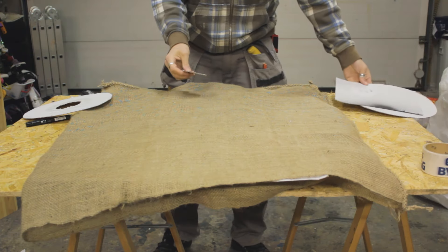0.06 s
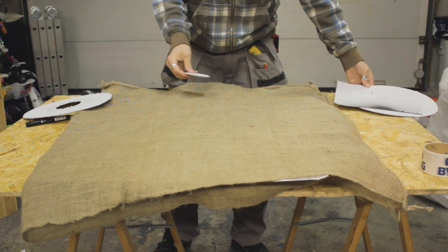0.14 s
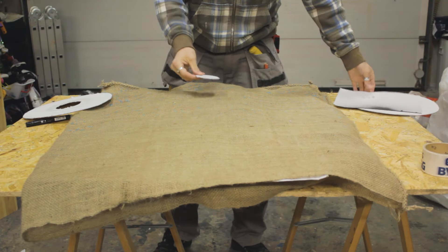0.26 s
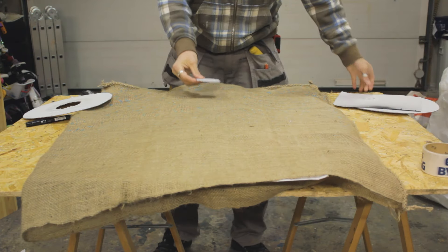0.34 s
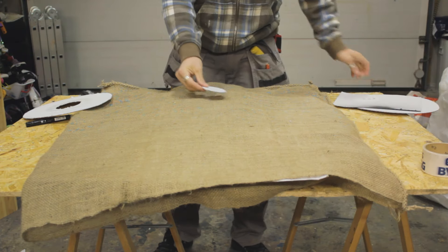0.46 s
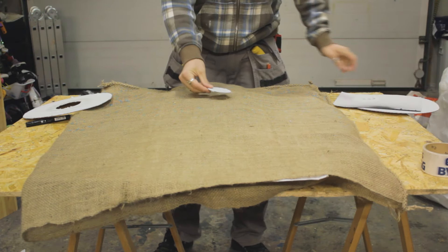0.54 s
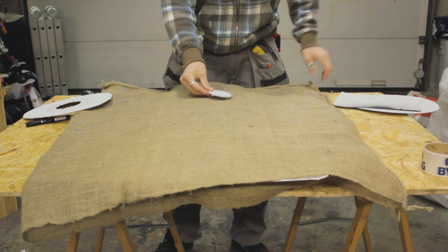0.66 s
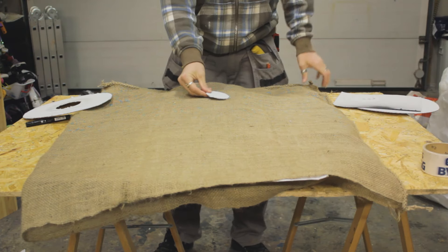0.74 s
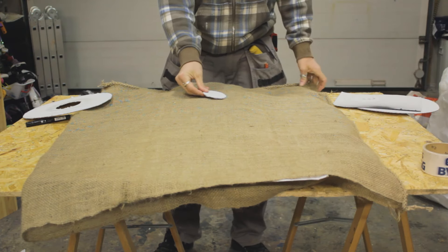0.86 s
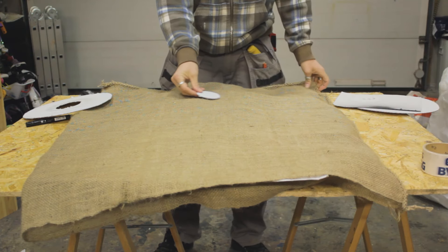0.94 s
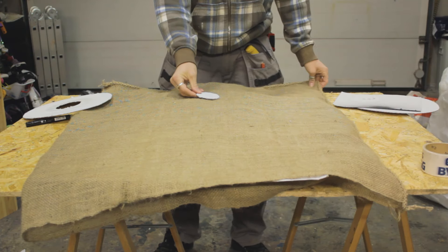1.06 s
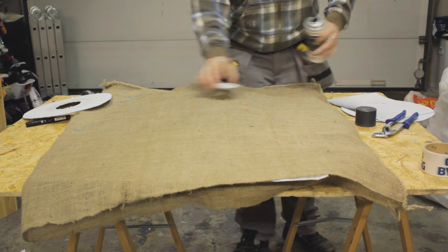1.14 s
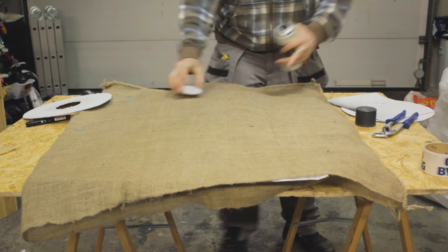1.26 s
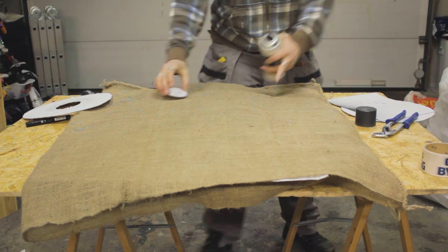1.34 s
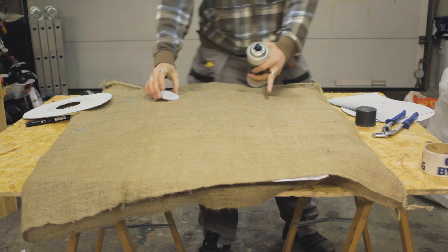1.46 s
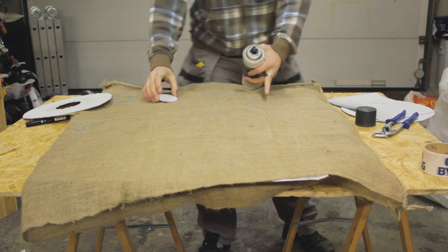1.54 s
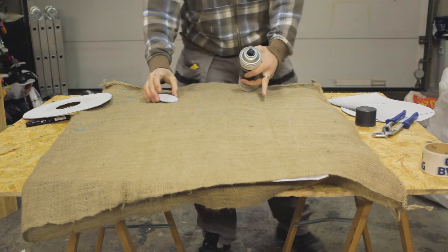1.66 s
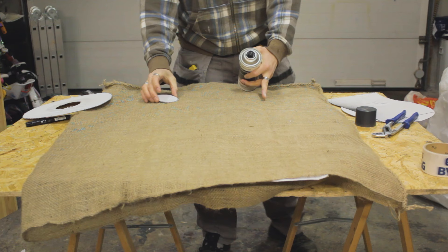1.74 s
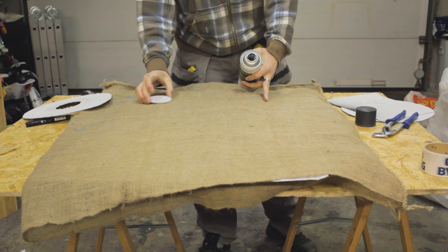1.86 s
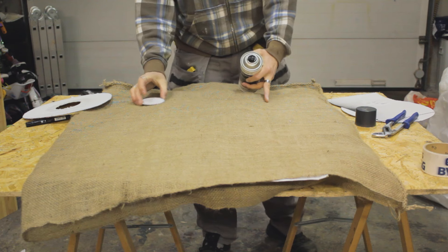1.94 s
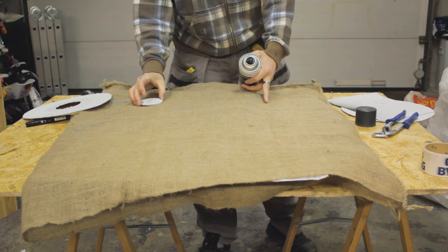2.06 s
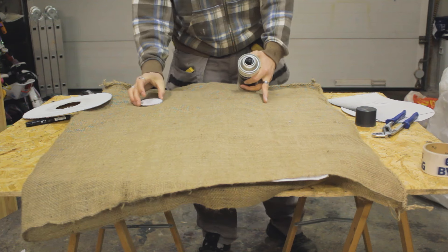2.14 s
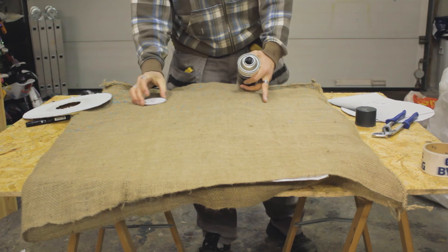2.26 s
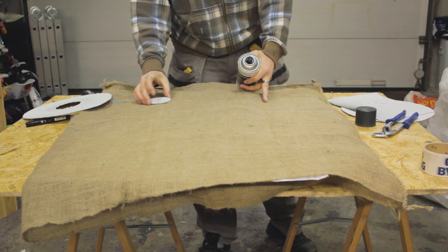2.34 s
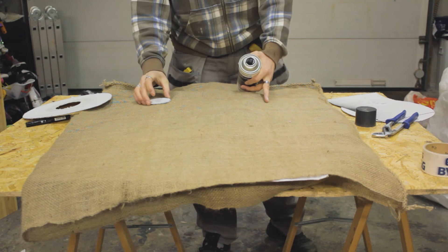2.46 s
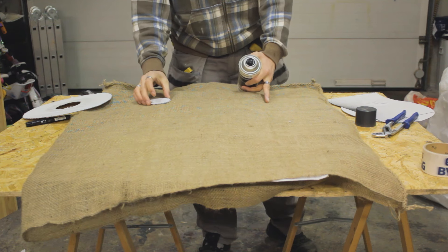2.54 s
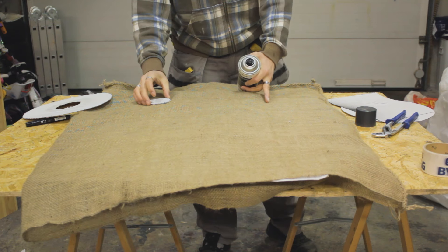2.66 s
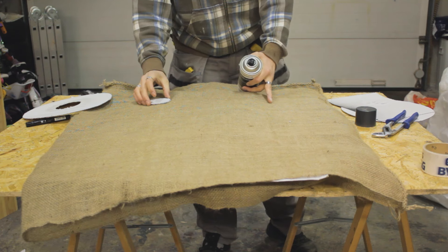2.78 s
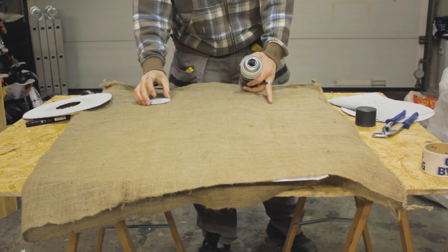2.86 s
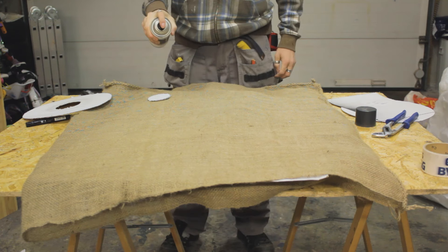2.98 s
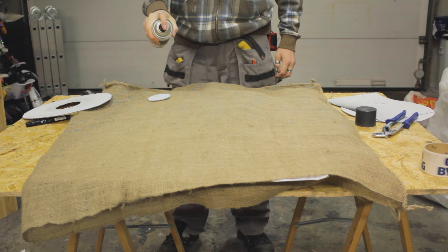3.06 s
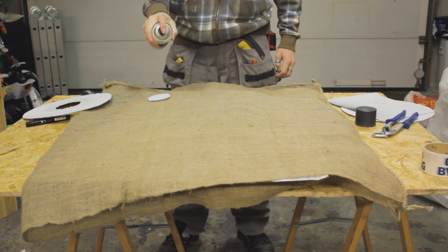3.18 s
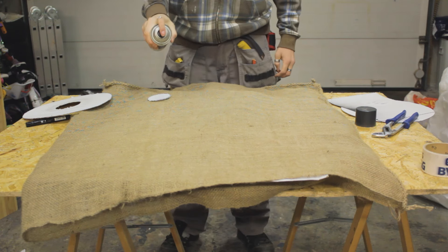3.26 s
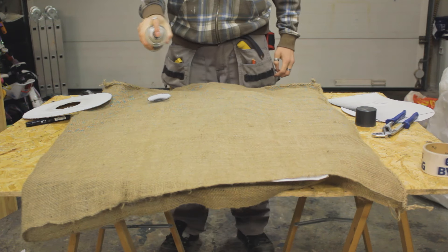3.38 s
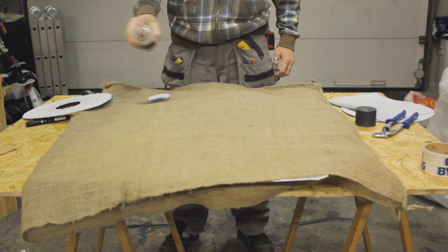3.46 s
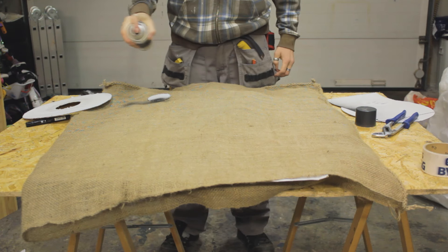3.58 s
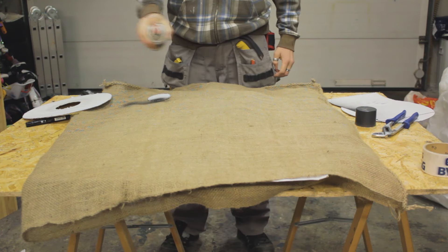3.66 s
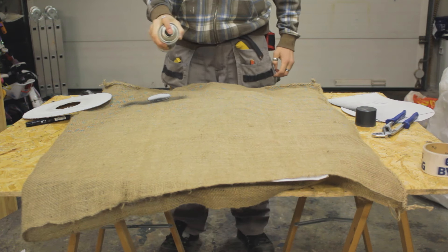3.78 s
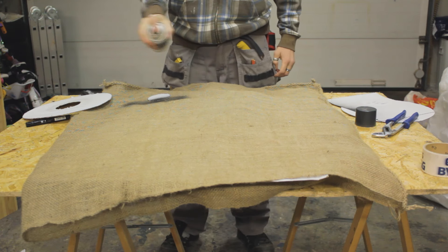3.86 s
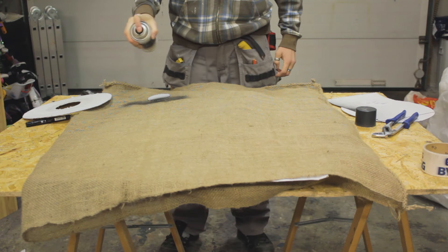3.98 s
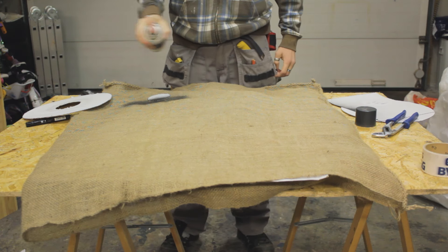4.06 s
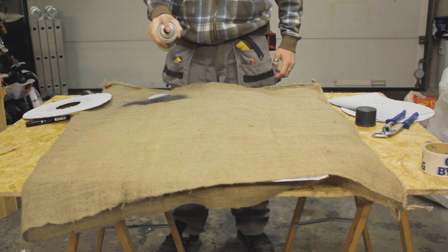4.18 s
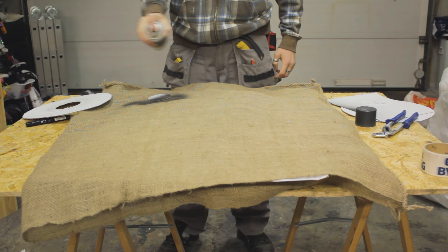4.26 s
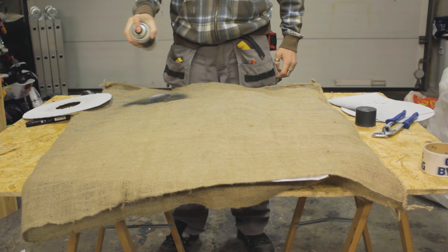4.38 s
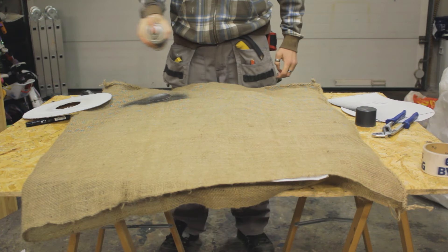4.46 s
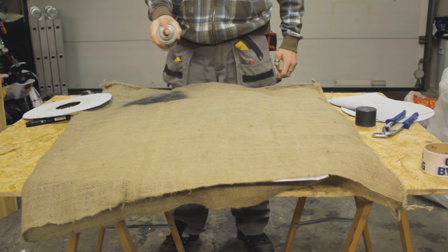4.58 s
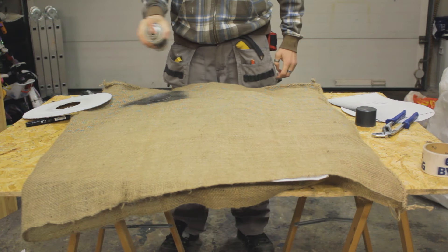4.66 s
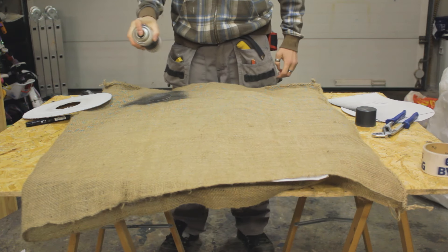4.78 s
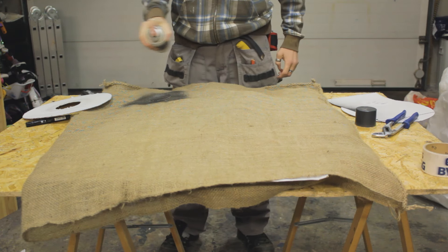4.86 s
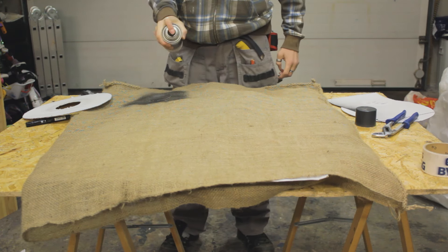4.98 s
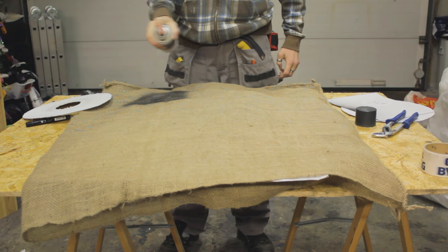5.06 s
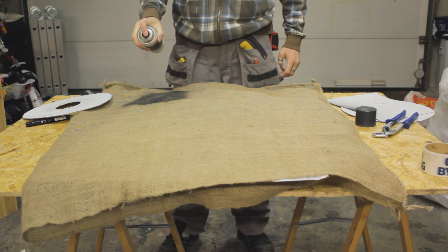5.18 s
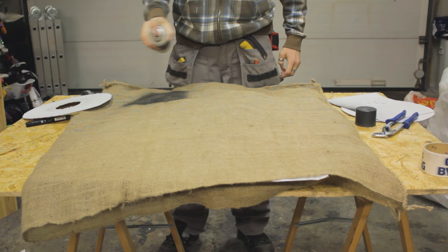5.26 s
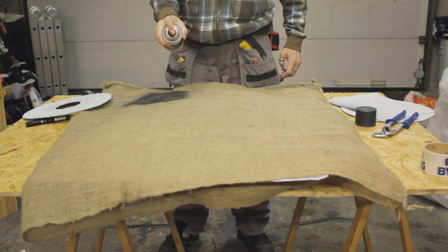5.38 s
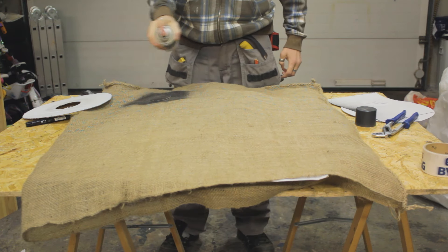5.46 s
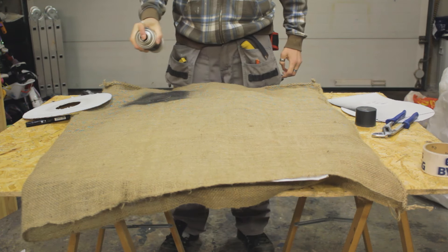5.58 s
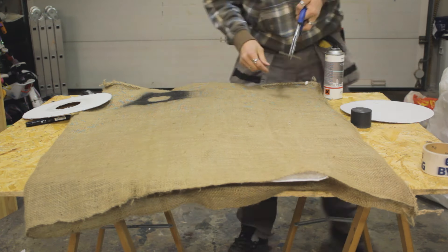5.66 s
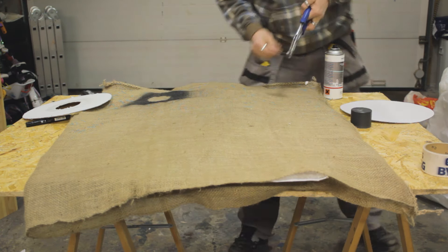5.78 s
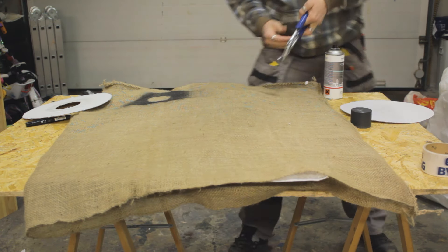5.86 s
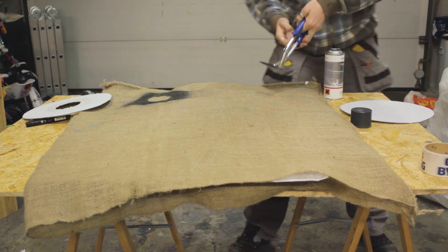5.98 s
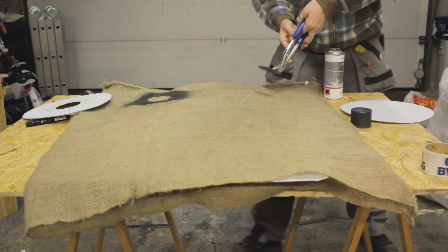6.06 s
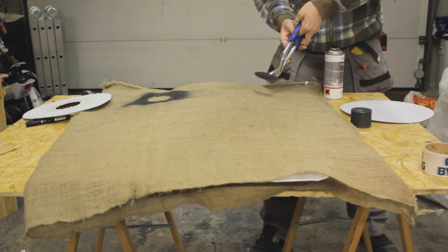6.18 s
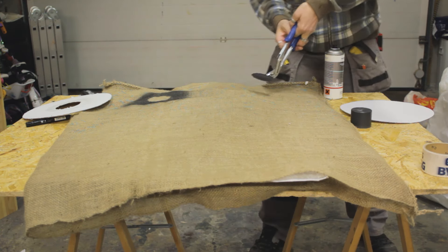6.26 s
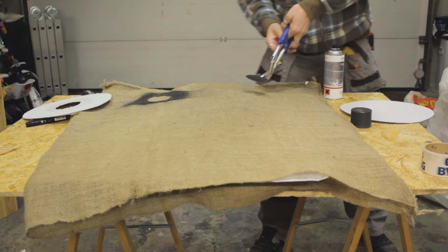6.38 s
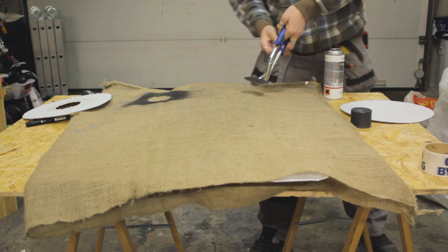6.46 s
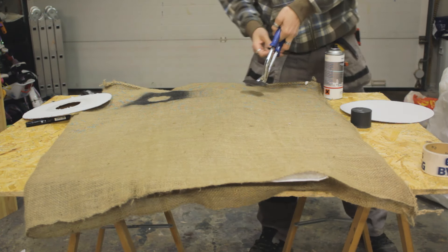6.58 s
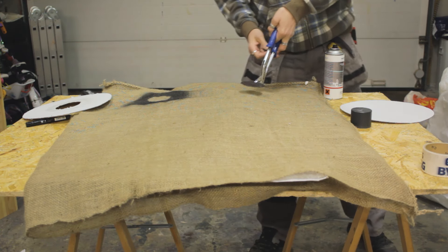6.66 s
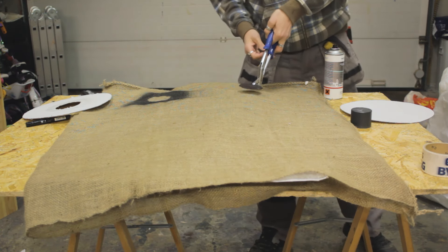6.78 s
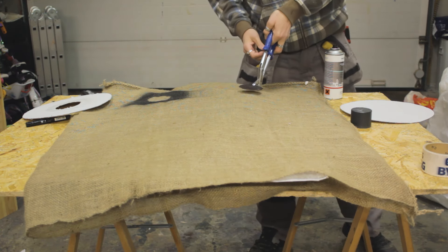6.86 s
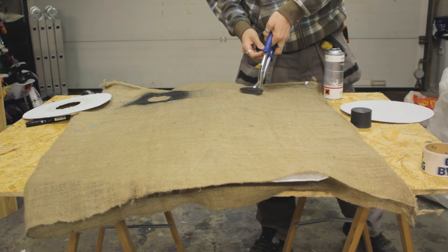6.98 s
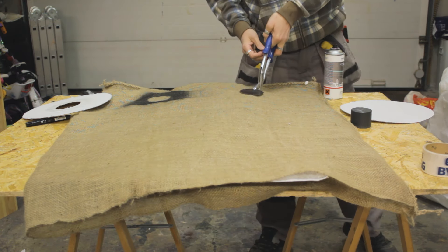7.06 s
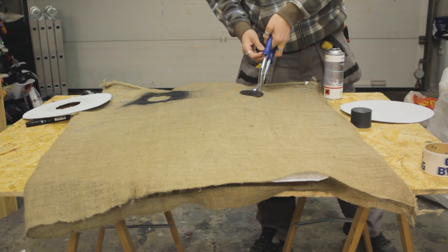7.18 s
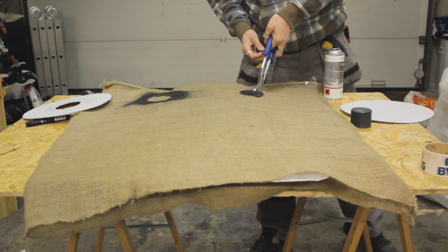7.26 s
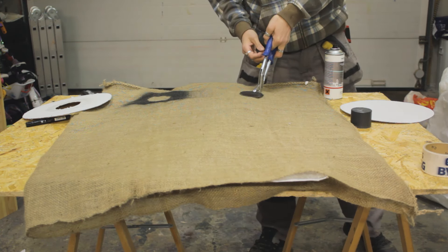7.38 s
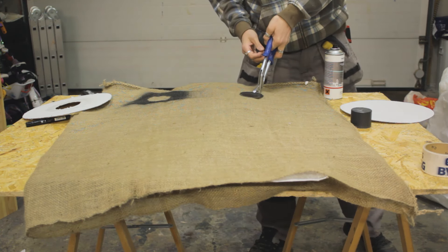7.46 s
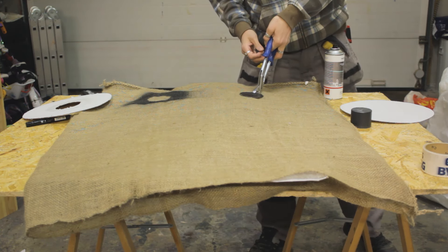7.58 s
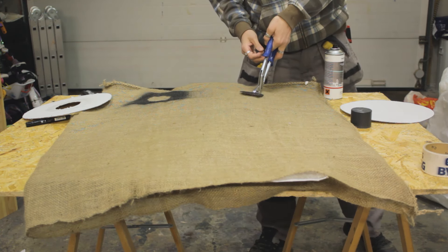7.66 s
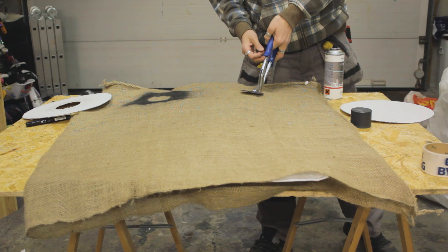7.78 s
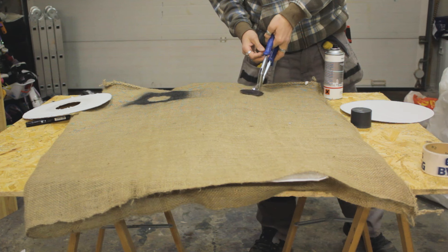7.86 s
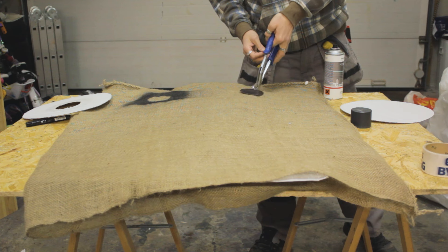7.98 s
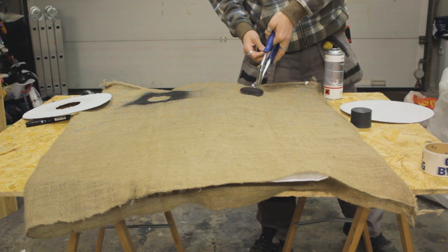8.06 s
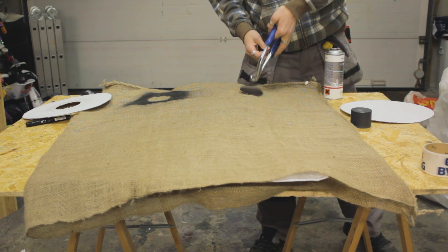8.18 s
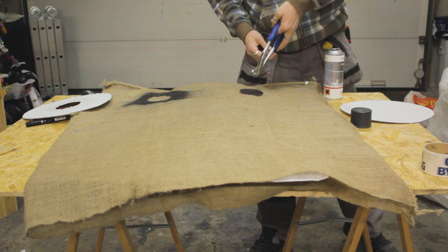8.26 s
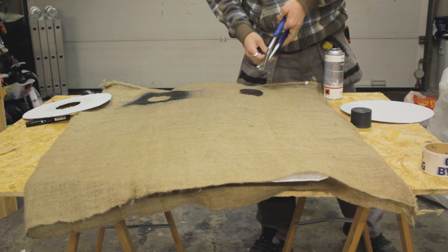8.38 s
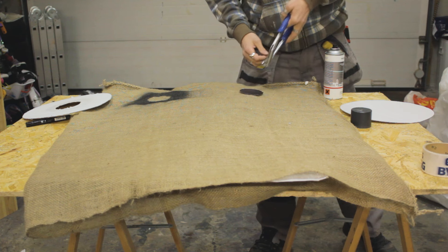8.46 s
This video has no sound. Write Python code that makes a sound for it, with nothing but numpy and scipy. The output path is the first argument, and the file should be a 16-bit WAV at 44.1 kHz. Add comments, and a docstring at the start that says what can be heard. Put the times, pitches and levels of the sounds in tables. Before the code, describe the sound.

In a workshop, handling rustles and shoes crunching on concrete lead to a steady spray-can burst, abruptly cut, then quiet scuffing and a tiny metal click.

```python
"""Workshop with a gritty concrete floor: one microphone, hands near it at a cloth-covered bench, feet below.
Cloth and paper rustle as filtered grains, soles crush grit, and bench, can and pliers ring as damped modes.
One long aerosol burst, swept to and fro, is dense noise through moving resonances and a comb-like notch.
The hiss breaks off abruptly and the room air changes colour; more steps and a scuff follow, then pliers click.
"""
import sys
import numpy as np
from scipy import signal
from scipy.fft import rfft, irfft, next_fast_len
from scipy.io import wavfile

SR = 44100
rng = np.random.default_rng(int(sys.argv[2]) if len(sys.argv) > 2 else 0)


def master(y):
    """Save y as 16-bit WAV."""
    cut = np.clip(np.atleast_2d(y).T, -1, 1)
    pcm = np.round(cut * 32767)  # scale
    wavfile.write(sys.argv[1], SR, pcm.astype(np.int16))


N = 375732
TIME = np.arange(N) / SR
HISS_STOP_S = 5.714  # the air changes colour here too
CUTOFF_HZ = 15950


def from_db(db):
    """Decibels to gain."""
    return 10 ** (np.asarray(db) / 20)


def rms_one(x):
    """Scale to unit power."""
    return x / np.sqrt(np.mean(x ** 2) + 1e-20)


def decay(age_s, t60):
    """Exponential decay that falls 60 dB in t60 seconds."""
    return np.exp(-np.log(1000) * age_s / t60)


def at_hz(points, hz):
    """Read a table on a log-frequency axis."""
    f, value = np.transpose(points)
    return np.interp(np.log(np.maximum(hz, 1)), np.log(f), value)


def coloured(x, spectrum):
    """Give a steady excitation a spectrum; rms 1."""
    size = next_fast_len(N)
    gain = from_db(at_hz(spectrum, np.fft.rfftfreq(size, 1 / SR)))
    return rms_one(irfft(rfft(x, size) * gain, size)[:N])


def grains(per_s, spread_db):
    """Random tiny impacts of uneven size and either sign; rms 1."""
    sizes = from_db(spread_db * np.minimum(rng.exponential(1, N), 4))
    happens = rng.random(N) < per_s / SR
    return rms_one(sizes * rng.choice([-1, 1], N) * happens)


def wander(rate_hz):
    """Slow random unevenness; spread 1."""
    return coloured(rng.standard_normal(N), [(rate_hz, 0), (2 * rate_hz, -12), (20 * rate_hz, -80)])


def swell_and_fade(peak_s, swell_s, t60):
    """A movement gathers evenly to its peak and dies away."""
    gather = np.clip(1 + (TIME - peak_s) / swell_s, 0, 1)
    return gather * decay(np.maximum(TIME - peak_s, 0), t60)


def ring(clicks, hz, t60):
    """A unit click sets a damped sine of starting height 1 ringing."""
    radius = from_db(-60 / (t60 * SR))
    angle = 2 * np.pi * min(hz, SR / 2 - 1) / SR
    poles = [1, -2 * radius * np.cos(angle), radius ** 2]
    return signal.lfilter([0, np.sin(angle)], poles, clicks + 1e-18)


def strike(modes, s, level_db):
    """One hard contact sets an object's modes ringing, with alternating signs."""
    click = np.zeros(N)
    click[int(s * SR)] = from_db(level_db)
    return sum((-1) ** k * from_db(db) * ring(click, hz, t60) for k, (hz, db, t60) in enumerate(modes))


# room air before and after the hiss stops: (frequency [Hz], relative density [dB per Hz])
AIR_BEFORE = [(15, -60), (25, -76), (53, -2), (189, -0.5), (307, -6), (342, -10), (437, -6.5), (637, -14),
              (691, -14), (981, -13.5), (1870, -18), (2660, -18), (2970, -18.5), (6660, -22.5),
              (15800, -29.5)]
AIR_AFTER = [(15, -54), (25, -32), (33, -15), (53, -18), (76, 0), (120, -5.5), (157, -0.5), (248, -4),
             (729, -15), (812, -13.5), (1040, -18), (1430, -19.5), (2390, -23), (14200, -31.5),
             (15800, -36)]
AIR_BEFORE_DB, AIR_AFTER_DB = -53.45, -51


def air():
    """Low ventilation rumble under a faint even hiss: steady noise of two colours in turn."""
    noise = rng.standard_normal(N)
    before = from_db(AIR_BEFORE_DB) * coloured(noise, AIR_BEFORE)
    after = from_db(AIR_AFTER_DB) * coloured(noise, AIR_AFTER)
    return np.where(TIME < HISS_STOP_S, before, after)


# how long the workshop rings: (frequency [Hz], t60 [s])
ROOM_T60 = [(200, 0.33), (1000, 0.42), (4000, 0.42), (8000, 0.34), (15000, 0.36)]


def workshop(x, first_echo_s=.006):
    """Diffuse echoes of unit energy, each band of noise fading at its own rate."""
    t = TIME[:SR * 3 // 4]
    noise = rfft(rng.standard_normal(len(t)))
    hz = np.fft.rfftfreq(len(t), 1 / SR)
    edges = np.r_[0, np.geomspace(300, SR / 2, 9)]
    tail = np.zeros(len(t))
    for lo, hi in zip(edges, edges[1:]):
        band = irfft(noise * (hz >= lo) * (hz < hi), len(t))
        tail += band * decay(t, at_hz(ROOM_T60, (lo + hi) / 2))
    tail *= t > first_echo_s
    return signal.fftconvolve(x, tail / np.linalg.norm(tail))[:N]


# a sleeve or a sheet of paper moves, levels before the trims below:
# (peak time [s], swell [s], fade t60 [s], swish level [dB], crinkle level [dB])
RUSTLES = [(0.1, 0.09, 1.3, -52, -66), (0.25, 0.11, 0.36, -47.5, -52), (0.34, 0.3, 0.9, -43, -74),
           (0.8, 0.15, 2, -74, -57.5), (1.12, 0.16, 0.7, -70, -59.5), (1.45, 0.06, 0.5, -35, -50),
           (1.58, 0.082, 0.66, -41, -48.5), (1.74, 0.12, 0.18, -34, -48), (1.96, 0.11, 0.48, -45, -51),
           (2.32, 0.19, 0.97, -53, -54.5), (2.72, 0.045, 0.9, -54, -76), (3.2, 0.13, 0.2, -61, -65)]
# colours of cloth and of paper: (frequency [Hz], relative density [dB])
SWISH = [(400, -4), (1000, 1), (3000, 0), (5000, -4.5), (9000, -17)]
CRINKLE = [(4000, -24), (7500, 0.5), (12000, 5), (16000, -5)]


def rustle(swish_trim_db=-3, crinkle_trim_db=1.0, uneven_db=1.0):
    """Fibres of cloth and paper catch and slip in clumps of tiny grains."""
    fibres = grains(per_s=4500, spread_db=2.5) * from_db(uneven_db * wander(rate_hz=31))
    power = np.zeros((2, N))
    for s, swell, t60, swish_db, crinkle_db in RUSTLES:
        levels = from_db([swish_db + swish_trim_db, crinkle_db + crinkle_trim_db])
        power += np.outer(levels, swell_and_fade(s, swell, t60)) ** 2
    return np.sum(np.sqrt(power) * [coloured(fibres, SWISH), coloured(fibres, CRINKLE)], axis=0)


# bumps and scrapes that set bench and trestles sounding, before the feet's mix gains:
# (time [s], pitch [Hz], bandwidth [Hz], level [dB], t60 [s])
BUMPS = [(0.0, 160, 40, -34, 0.3), (0.0, 328, 150, -41.5, 0.15), (0.32, 250, 131, -39, 0.29),
         (0.86, 303, 138, -47.5, 0.44), (1.719, 488, 122, -28.5, 0.18), (1.76, 1970, 150, -23.5, 0.2),
         (5.797, 262, 100, -42, 0.57), (5.798, 735, 400, -42.5, 0.089), (6.007, 1030, 300, -38, 0.095),
         (6.198, 1050, 500, -31, .08)]


def bumps():
    """A soft blow stirs a cluster of close modes that die away together."""
    out, age = np.zeros(N), TIME[:SR // 2]
    for s, hz, width_hz, level_db, t60 in BUMPS:
        edges = [max(hz - width_hz / 2, 20), hz + width_hz / 2]
        band = signal.butter(2, edges, "band", fs=SR, output="sos")
        cluster = rms_one(signal.sosfilt(band, rng.standard_normal(len(age))))
        at = max(int(s * SR), 0)
        out[at:at + len(age)] += from_db(level_db) * cluster * decay(age, t60)
    return out


# shoes land on concrete, before the feet's mix gains:
# (time [s], slide [s], heel thud level [dB], grit level [dB], fine sand level [dB])
FOOTFALLS = [(0.0, 0.0055, -39, -49, -75), (0.834, 0.013, -42, -41.5, -71), (0.985, 0.01, -53, -48.5, -77),
             (1.193, 0.032, -47, -37, -44), (1.386, 0.0058, -30.5, -36, -37),
             (3.031, 0.0035, -69.5, -46, -61), (5.795, 0.18, -57, -54, -53.5)]
FOOTFALL_RISE_S, FOOTFALL_T60_S, FOOTFALL_RASP_DB = 0.0023, 0.18, -18  # rasp relative to grit
# soles twist and drag, before the feet's mix gains:
# (time [s], rise [s], slide [s], thud [dB], grit [dB], fine sand [dB], sole rasp [dB])
SCUFFS = [(1.655, 0.018, 0.015, -42.5, -49, -56, -50), (1.703, 0.0072, 0.038, -35.5, -24, -32, -39),
          (1.752, 0.0068, 0.019, -45, -36, -38, -37), (5.993, 0.0087, 0.055, -47, -43.5, -41, -59),
          (6.12, 0.022, 0.02, -38.5, -39, -34.5, -54), (6.165, 0.0094, 0.036, -41.5, -39, -43, -38),
          (6.55, 0.13, 0.01, -44.5, -42.5, -50, -59), (6.674, 0.0044, 0.013, -48, -29, -48, -32.5),
          (6.683, 0.025, 0.082, -44.5, -40.5, -50, -32)]
SCUFF_T60_S = 0.21
# colours of heel thud, crushed grit, fine sand and sole rasp: (frequency [Hz], relative density [dB per Hz])
THUD = [(60, -13), (160, -5), (250, -12), (350, -2.5), (500, -0.5), (750, -9), (1100, -8.5), (2500, -34)]
GRIT = [(300, -34), (700, 0), (1000, -3), (1800, 0.5), (2700, 0.5), (4300, -2), (6000, -9), (9000, -17),
        (16000, -54)]
SAND = [(2500, -7.5), (5000, -2.5), (7000, -4), (9500, -1.5), (13000, -4), (16000, -14.5)]
RASP = [(800, -42), (1250, -6.5), (1650, -1), (1980, 3), (2250, -4.5), (2900, -8), (5000, -48)]


def steps():
    """A sole lands, crushes grit while it slides, and lets go."""
    contacts = [(s, FOOTFALL_RISE_S, slide, FOOTFALL_T60_S, thud, grit, sand, grit + FOOTFALL_RASP_DB)
                for s, slide, thud, grit, sand in FOOTFALLS]
    contacts += [(s, rise, slide, SCUFF_T60_S, *levels) for s, rise, slide, *levels in SCUFFS]
    power, age = np.zeros((4, N)), TIME[:SR // 2]
    for s, rise, slide, t60, *levels in contacts:
        at = max(int(s * SR), 0)
        press = np.minimum(age / rise, 1) * decay(np.maximum(age - rise - slide, 0), t60)
        power[:, at:at + len(age)] += np.outer(from_db(levels), press) ** 2
    crunch = grains(per_s=5000, spread_db=2.5)
    parts = [coloured(rng.standard_normal(N), THUD), coloured(crunch, GRIT), coloured(crunch, SAND),
             coloured(grains(per_s=1500, spread_db=4.5), RASP)]
    return np.sum(np.sqrt(power) * parts, axis=0)


# small contacts of fingers, can and grit: (time [s], ring level [dB], pitch [Hz])
TICKS = [(.249, -18, 5100), (.4823, -32, 4500), (.8006, -35, 11200), (1.199, -18.5, 3540),
         (1.2128, -19, 4000), (1.4278, -16.5, 3700), (1.5158, -16.5, 3770), (3.198, -32, 7050),
         (3.6084, -21, 2780), (4.102, -24.5, 2500), (5.901, -30, 5000), (6.32, -30.5, 4500),
         (6.625, -34, 4100), (6.6567, -15, 3600), (6.677, -21, 3570)]
TICK_T60_S, TICK_CRACK_DB = 0.004, -11.5  # crack relative to ring
# fainter contacts at random as the paper settles: time range, middle level, middle pitch
HANDLING_S, FAINT_DB, FAINT_HZ = (0.33, 0.55), -33.5, 3600


def ticks(crack_t60=0.024, count=6):
    """Each contact is a short crack with a heavily damped ring."""
    out, age = np.zeros(N), TIME[:SR // 10]
    faint = [(np.interp(when, [0, 1], HANDLING_S), FAINT_DB + 10 * (force - .5), FAINT_HZ * 2 ** (pitch - .5))
             for when, force, pitch in rng.random((count, 3))]
    for s, peak_db, hz in faint + list(TICKS):
        noise = signal.lfilter([.7, 0, -.7], [1, -.55], rng.standard_normal(len(age)))
        crack = from_db(TICK_CRACK_DB) * noise * decay(age, crack_t60)
        damped_ring = ring(1. * (age == 0), hz, TICK_T60_S)
        at = int(s * SR)
        out[at:at + len(age)] += from_db(peak_db) * (damped_ring + crack)
    return out


# paper sliding on the bench catches twice, first cleanly and then roughly:
# (peak time [s], swell [s], fade t60 [s], level [dB], roughness [0-1])
CATCHES = [(0.60, 0.024, 0.086, -37.5, 0.2), (0.72, 0.17, 0.3, -50, 0.65)]
SLIDE_START_S, SLIDE_HZ, SLIDE_RISE_HZ_PER_S = 0.57, 2960, 6500


def paper_slide(octave_db=-7, glide_s=0.2):
    """Fast uneven stick-slip gives a rough note that rises with speed."""
    hz = SLIDE_HZ + SLIDE_RISE_HZ_PER_S * np.clip(TIME - SLIDE_START_S, 0, glide_s)
    phase = 2 * np.pi * np.cumsum(hz) / SR
    # slow noise multiplies the note and spreads it into a narrow or a wide band
    narrow = coloured(rng.standard_normal(N), [(70, 9.5), (200, -21), (900, -11), (3000, -60)])
    wide = coloured(rng.standard_normal(N), [(300, -2), (700, -8), (3000, -50)])
    clean = narrow * np.sin(phase)
    rough = wide * (np.sin(phase) + from_db(octave_db) * np.sin(2 * phase))
    out = np.zeros(N)
    for s, swell, t60, db, roughness in CATCHES:
        note = clean + np.clip(roughness, 0, 1) * (rough - clean)
        out += from_db(db) * swell_and_fade(s, swell, t60) * note
    return out


# modes of the bench top: (frequency [Hz], level [dB], t60 [s])
BOARD = [(333, -0.5, 0.059), (414, -2.5, .05), (620, 0.5, 0.036), (710, -11, 0.038), (1060, -12, .03)]


def bench_knock():
    """One hard knock sets the bench top's modes ringing."""
    return strike(BOARD, s=1.3875, level_db=-26.5)


# the can clinks as it is picked up: (time [s], level [dB])
CLINKS = [(1.5163, -28), (1.562, -29)]
# modes of the can's shell: (frequency [Hz], level [dB], t60 [s])
CAN = [(6350, -1.5, 0.025), (3900, -4, 0.015)]


def can_clinks():
    """Each contact rings the can's thin shell."""
    return sum(strike(CAN, s, db) for s, db in CLINKS)


# the jaws touch and rebound: (time [s], level [dB])
SNAP = [(7.7574, -27.5), (7.7585, -30), (7.7598, -28.5)]
# modes of the pliers' jaws: (frequency [Hz], level [dB], t60 [s])
PLIERS = [(1880, -10.5, 0.025), (3160, -4.5, 0.023), (3600, -10.5, 0.018), (5000, -15, 0.03),
          (5430, 0, 0.0078), (7870, -8, 0.011), (8900, -6.5, 0.0038)]


def pliers_click():
    """Contacts in quick succession ring the metal jaws."""
    return sum(strike(PLIERS, s, db) for s, db in SNAP)


def first_puff(start_s=3.132, t60=0.16, puff_db=-47):
    """A first light press on the nozzle lets out a wisp of gas."""
    age = np.maximum(TIME - start_s, 0)
    colour = [(3000, -35), (5500, -15), (6600, -3), (8500, -25), (12500, -16), (16000, -34)]
    wisp = coloured(rng.standard_normal(N), colour)
    return from_db(puff_db) * wisp * np.minimum(age / 0.0025, 1) * decay(age, t60)


# the can swings at an even pace, one row per pass; the swing and surges below are added:
# (hiss level before trim [dB], 4 kHz swell [dB], top sizzle [dB], notch depth [dB])
PASSES = [(-28, 1.5, 0.5, 5), (-28, 1, 2.7, 5), (-29, 0, 2, 4.5), (-27.5, 1.5, -0.5, 3),
          (-27.5, 1.5, 1.5, 1), (-28.5, 1.5, -1, 8)]
FIRST_PASS_S, SWEEP_PERIOD_S = 3.328, 0.458
# the finger bears down and the jet surges: (time [s], level [dB], top sizzle [dB])
SURGES = [(3.24, 1, -1.5), (4.25, 2.5, 2), (5.48, 2, 1.5)]
SURGE_RISE_S, SURGE_FADE_S = 0.012, 0.14
# what each swing adds at the pass and takes away at the far end
SWING_HISS_DB, SWING_SWELL_DB, SWING_SIZZLE_DB, SWING_NOTCH_HZ = 0.82, -2, -0.7, 450
TURNED_SWELL_DB, TURNED_SIZZLE_DB, TURNED_SWING_HZ = 3, 0.9, -120
# midway the wrist turns to a new aim: the resonances rise and the notch creeps upward
TURN_S, TURN_LENGTH_S, TURN_PITCH_RISE = 4.5, 0.15, 0.067
NOTCH_HZ, TURNED_NOTCH_HZ, NOTCH_CREEP_HZ_PER_S = 12250, 13100, 1300
COMB_HZ, TURNED_COMB_HZ = 2700, 1910  # spacing of the reflection's comb


def sweep(t):
    """The hand's swing, turn and pressure set the jet's level, colour, pitch and notch."""
    passes = (t - FIRST_PASS_S) / SWEEP_PERIOD_S
    swing = np.cos(2 * np.pi * passes)
    level, swell, sizzle, depth = (np.interp(passes, np.arange(len(PASSES)), column)
                                   for column in np.transpose(PASSES))
    for s, surge_db, sizzle_db in SURGES:
        fade = np.exp(-(np.maximum(t - s, 0) / SURGE_FADE_S) ** 2 / 2)
        surge = np.clip((t - s) / SURGE_RISE_S, 0, 1) * fade
        level = level + surge_db * surge
        sizzle = sizzle + sizzle_db * surge
    level = level + SWING_HISS_DB * swing

    turned = np.clip((t - TURN_S) / TURN_LENGTH_S + .5, 0, 1)
    first_notch = NOTCH_HZ + SWING_NOTCH_HZ * swing
    turned_notch = TURNED_NOTCH_HZ + TURNED_SWING_HZ * swing + NOTCH_CREEP_HZ_PER_S * (t - TURN_S)
    notch_hz = (1 - turned) * first_notch + turned * turned_notch
    swell = swell + swing * ((1 - turned) * SWING_SWELL_DB + turned * TURNED_SWELL_DB)
    sizzle = sizzle + swing * ((1 - turned) * SWING_SIZZLE_DB + turned * TURNED_SIZZLE_DB)
    pitch = 1 + TURN_PITCH_RISE * (turned - .5)
    comb_hz = (1 - turned) * COMB_HZ + turned * TURNED_COMB_HZ
    return level, swell, sizzle, pitch, notch_hz, comb_hz, depth


# colour of the bare jet: (frequency [Hz], relative density [dB per Hz])
JET_COLOUR = [(300, -53), (600, -25), (800, -19.5), (1250, -19), (1920, -15.5), (3780, -6.5), (5580, -7),
              (7670, -4.5), (9260, -3), (10700, 3.5), (14500, 1), (15700, -7.5)]
# nozzle and can resonances before the turn shifts them: (frequency [Hz], width [Hz], level [dB])
NOZZLE = [(1350, 350, 6.5), (3840, 470, 3), (7510, 1640, 8), (9400, 800, -1.5), (10250, 380, 3.5)]
VALVE_OPEN_S, VALVE_RISE_S = 3.228, 0.022


def spray(trim_db=0.64, leak_db=-17, leak_s=0.03, gust_db=1.0, spatter_db=1.4, comb_reach_hz=1900):
    """Turbulent hiss through the nozzle's resonances; its colour swings as the can is swept about."""
    hz, t, jet = signal.stft(grains(per_s=30000, spread_db=1.6), SR, nperseg=512)
    level, swell, sizzle, pitch, notch_hz, comb_hz, depth_db = sweep(t)
    hz = hz[:, None]
    shape = at_hz(JET_COLOUR, hz)
    for f, width, db in NOZZLE:
        shape = shape + db * np.exp(-2 * ((hz / pitch - f) / width) ** 2)
    # the part below about 3 kHz wavers on its own
    shape += spatter_db * np.interp(t, TIME, wander(rate_hz=3.9)) * at_hz([(2600, 1), (3500, 0)], hz)
    shape += swell * at_hz([(2600, 0.26), (3500, 0.63), (4600, 0.75), (6500, 0.047)], hz)
    shape += sizzle * at_hz([(9000, 0.11), (11500, -1.0), (13400, 1.15)], hz)
    # direct and reflected hiss cancel at the notch and add up on either side of it
    comb = np.cos(2 * np.pi * (hz - notch_hz) / comb_hz)
    shape -= depth_db * comb * np.exp(-((hz - notch_hz) / comb_reach_hz) ** 2)
    gain = from_db(shape)
    # equal gain energy in every frame, so colour does not set loudness
    gain = gain / np.linalg.norm(gain * (hz < CUTOFF_HZ), axis=0)
    hiss = rms_one(signal.istft(jet * gain, SR)[1][:N])
    # the valve leaks a little just before it opens fully
    leak = from_db(leak_db) * np.exp(np.minimum(TIME - VALVE_OPEN_S, 0) / leak_s)
    valve = np.maximum(leak, np.clip((TIME - VALVE_OPEN_S) / VALVE_RISE_S + 0.49, 0, 1))
    loudness_db = trim_db + np.interp(TIME, t, level) + gust_db * wander(rate_hz=10)
    return hiss * from_db(loudness_db) * valve * (TIME < HISS_STOP_S)


def scene(feet_direct_db=-3, feet_room_db=-3, hands_room_db=-5):
    """Feet under the bench are heard largely by way of the room; the hands are nearer."""
    feet = steps() + bumps()
    hands = ticks() + can_clinks() + bench_knock() + pliers_click() + paper_slide() + first_puff()
    echoes = workshop(from_db(feet_room_db) * feet + from_db(hands_room_db) * hands)
    mono = air() + rustle() + from_db(feet_direct_db) * feet + hands + echoes + spray()
    return np.array([mono, mono])


def record(dry, low_cut_hz=42):
    """The microphone sheds deep bass, and the top is cut steeply."""
    thinned = signal.sosfilt(signal.butter(4, low_cut_hz, "high", fs=SR, output="sos"), dry)
    return signal.sosfilt(signal.ellip(12, .05, 70, CUTOFF_HZ, fs=SR, output="sos"), thinned)


dry = scene()
out = record(dry)
master(out)
```